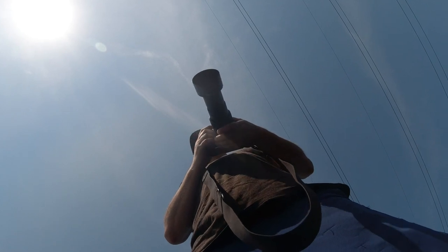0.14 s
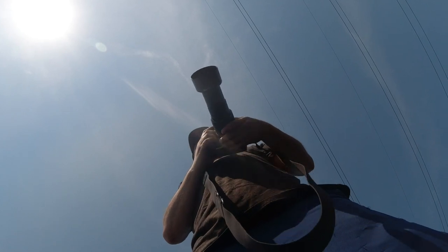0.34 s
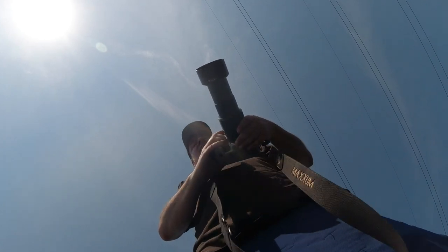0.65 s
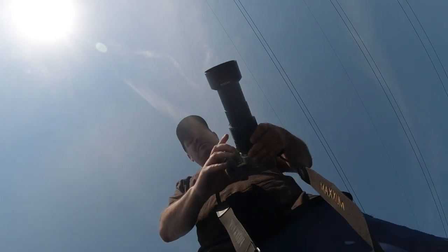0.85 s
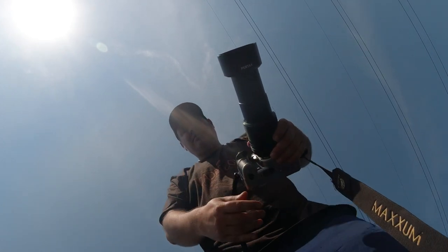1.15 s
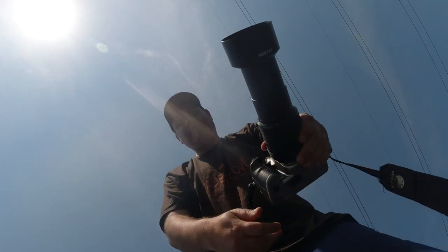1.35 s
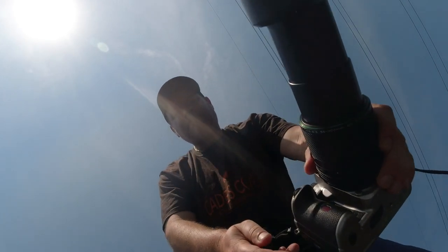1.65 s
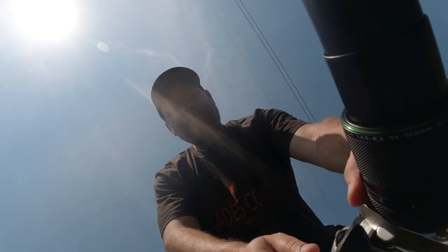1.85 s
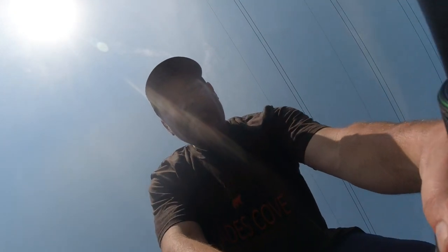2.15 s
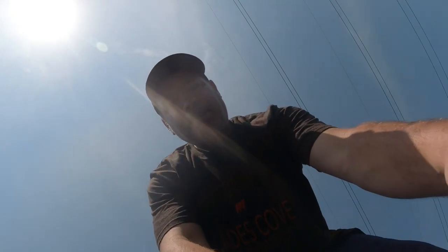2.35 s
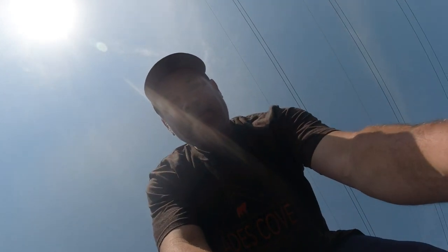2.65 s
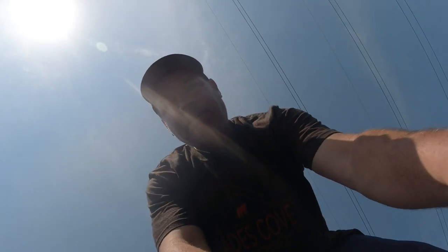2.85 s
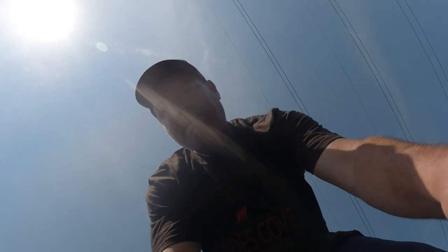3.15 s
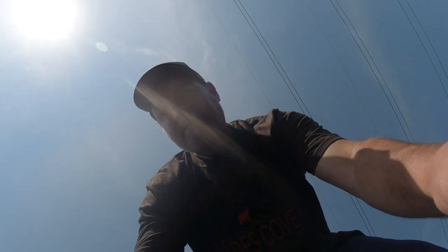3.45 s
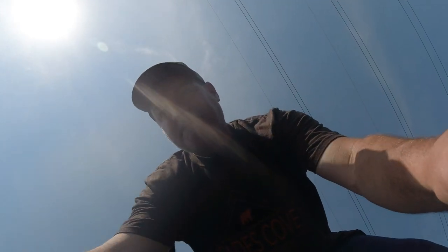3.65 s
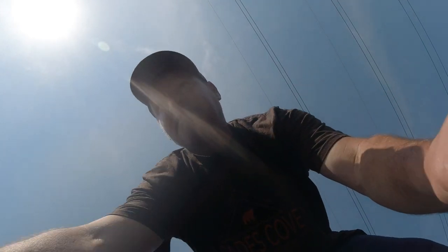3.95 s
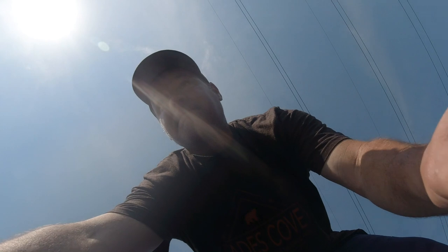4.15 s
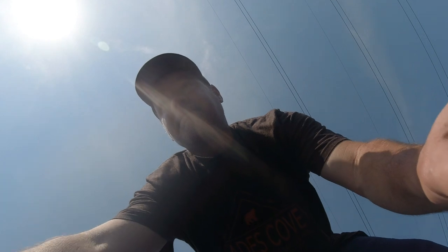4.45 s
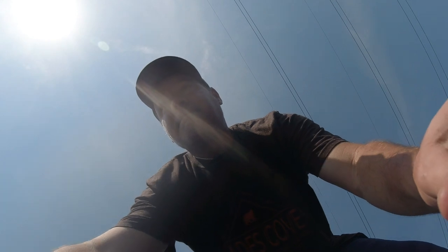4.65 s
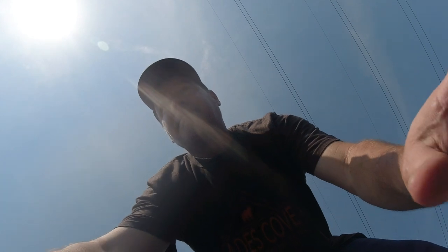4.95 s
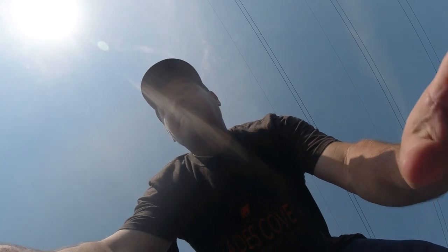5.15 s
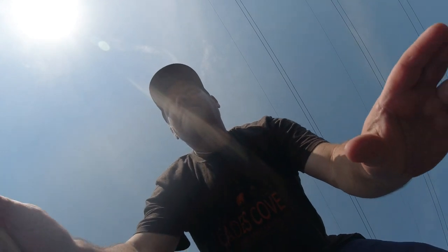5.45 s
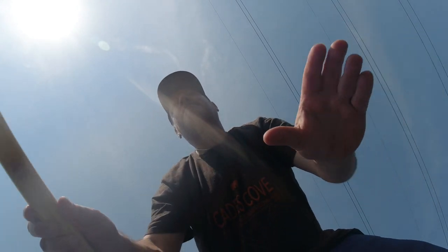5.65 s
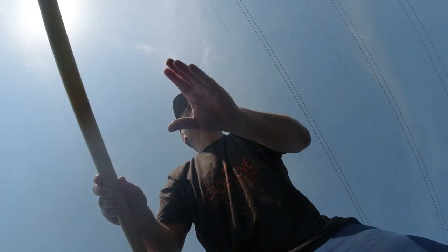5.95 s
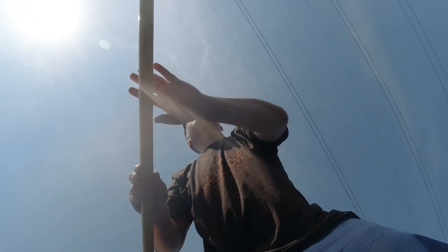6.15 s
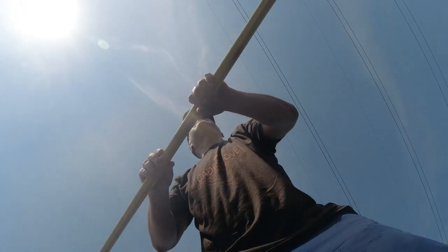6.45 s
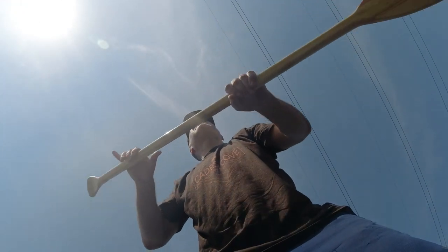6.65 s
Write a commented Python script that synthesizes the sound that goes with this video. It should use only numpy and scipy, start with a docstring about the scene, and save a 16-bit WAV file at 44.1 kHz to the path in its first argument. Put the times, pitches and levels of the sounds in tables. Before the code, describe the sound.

Close, dry handling inside a small hollow boat, the microphone low on the floor. Webbing slides and whistles narrowly, a lens barrel bumps dully, and the hull booms under knocks, loudest about three seconds in. After a lull, a wooden paddle drags and knocks with deep floor thuds, then only small taps and soft cloth remain over a very quiet murmur of air and water.

```python
"""On a calm lake, in a canoe, a man sets down a camera and takes up a wooden paddle, heard from the boat's floor.
Strap and clothes rustle and whistle narrowly as they rub: random tiny slips and filtered noise. Gear, paddle
and a hollow lens barrel are struck bodies: fading tones plus bursts of noise. Knocks and drags set the hollow
hull ringing the same way, and its floor thuds in slow swings. Under it all lies a low murmur of air and water,
made of filtered noise."""
import sys
import numpy as np
from scipy import signal
from scipy.fft import rfft, irfft, next_fast_len
from scipy.io import wavfile
from scipy.ndimage import uniform_filter1d, map_coordinates

SR = 44100
rng = np.random.default_rng(int(sys.argv[2]) if len(sys.argv) > 2 else 0)


def bounce(signal):
    """Save signal as a 16-bit WAV file at the path given by the first command-line argument."""
    frames = np.transpose(np.atleast_2d(signal))
    limited = np.clip(frames, -1, 1)
    pcm = np.round(limited * 32767).astype(np.int16)
    wavfile.write(sys.argv[1], SR, pcm)


N = 299439

# murmur of air and water: start_s, relative level_db
MURMUR_LEVEL = [(0, -45.5), (1.2, -48), (2.55, -48), (3.1, -51), (3.35, -58.5), (4.1, -60.5), (4.7, -57),
                (5.5, -60), (6.79, -58.5)]
# tone of the murmur: pitch_hz, relative level_db
LAKE_COLOUR = [(12, -36), (20, -5.5), (134, -2), (328, -11), (380, -12.5), (500, -19), (738, -19.5),
               (1150, -35), (1400, -36), (1910, -44.5), (2200, -42), (12100, -54.5), (16000, -77.5)]
# where the man works: start_s, delay of the left microphone port delay_ms
BEARING = [(0, -0.27), (1.2, 0.075), (2.6, 0.0092), (3.2, 0.053), (3.5, -0.11), (4.4, -0.08), (6.79, 0.02)]
# reflections inside the boat: delay_ms, gain (before it fades with delay), left-right spread_ms
WALLS = np.column_stack([rng.uniform(1, 13, 14), rng.uniform(-1, 1, 14), rng.uniform(-.1, .1, 14)])

# slides of strap and clothes: start_s, length_s, swell over the slide swell_db, rustle_db, hiss_db
SLIDES = [(.3, 1, 9, -79, -108), (1.225, 0.14, -19, -60.5, -77), (1.375, 0.17, 5, -56, -77.5),
          (1.51, 0.042, 11, -49, -60.5), (1.57, .39, 13, -49, -59), (2.065, 0.14, 6.5, -50, -93),
          (2.21, 0.078, 6, -57, -88), (2.37, 0.6, -13, -68, -96), (2.79, 0.064, 2.5, -47, -80),
          (2.945, 0.057, 12, -40.5, -59.5), (3, 0.1, -22, -39.5, -61), (3.245, 0.03, -6, -50.5, -97.5),
          (3.29, 0.34, -15, -67, -85), (3.46, 0.11, -9, -56, -87), (4.475, 0.048, -12.5, -66, -99),
          (4.8, 0.12, 7, -59, -81.5), (5.08, 0.11, 3.5, -70, -100.5), (5.4, 0.066, 2, -68, -93),
          (5.675, 0.057, -1, -55, -59.5), (5.775, 0.011, 5.5, -56, -59), (6.6, 0.17, 6, -77.5, -77.5)]
# tone of the rustle, and of the hiss of fast sliding: pitch_hz, relative level_db
CLOTH_COLOUR = [(300, -31), (550, -4), (850, -4), (1200, 0.5), (1430, -4.5), (1540, 0.5), (1680, -4.5),
                (1850, -8), (2400, -6), (3200, -8), (3900, -11.5), (4600, -15), (5500, -29), (8000, -30.5),
                (11000, -55.5)]
HISS_COLOUR = [(3000, -40), (5000, 2.5), (6500, -3.5), (8300, 4.5), (10000, -23), (11800, 2), (12900, 1.5),
               (13800, -12), (15500, -23.5)]
# narrow, rough whistles of rubbing: nylon webbing over an edge, or the ring of the lens barrel:
# start_s, length_s, pitch_hz, level_db
WHISTLES = [(1.428, 0.18, 1520, -60), (1.634, 0.28, 3320, -56), (2.07, 0.19, 3100, -53),
            (2.115, .11, 4180, -62), (2.214, .1, 3100, -54.5), (2.371, 0.08, 3360, -55),
            (2.769, 0.035, 3930, -56), (2.82, 0.039, 1540, -47.5), (3.295, 0.13, 3050, -65),
            (3.537, 0.23, 4150, -67.5), (3.506, 0.051, 4400, -57), (3.748, 0.017, 4420, -56.5),
            (3.771, 0.015, 4400, -59), (4.564, .12, 4400, -70), (4.832, 0.069, 3460, -61),
            (5.026, 0.019, 4360, -60), (5.419, 0.015, 4280, -60), (5.437, 0.023, 4380, -59)]
# dry snaps of hard plastic and metal: start_s, length_s, level_db, hardness_db_per_octave
SNAPS = [(1.2251, 0.0054, -29.5, -56), (3.006, 0.0014, -14.5, -2), (3.013, .0009, -28, -3.5),
         (3.0222, 0.00032, -17.5, -8.5), (3.0507, 0.0011, -31.5, -8.5)]
# tone of a snap before its hardness: pitch_hz, relative level_db
SNAP_COLOUR = [(600, -15.5), (1500, 5.5), (2100, -2.5), (2850, 8), (4200, -4.5), (6000, -12.5),
               (9000, -11.5), (12500, -7.5), (15000, -23)]
# wood and shoes drag on the hull: start_s, length_s, swell over the drag swell_db, level_db, bass weight bass_db
DRAGS = [(1.41, 0.64, 23, -55, 0.5), (2.06, .55, -9.5, -54.5, 1), (2.776, 0.11, -0.5, -39.5, 2),
         (2.949, 0.025, 8, -41.5, 3.5), (3.02, 0.086, -13, -35, -2), (3.475, 0.14, -5.5, -54, -2.5),
         (4.27, 0.064, 1, -52.5, 1), (4.468, 0.071, -2.5, -37, 4.5), (4.811, 0.15, 3.5, -45, -2.5),
         (5.064, 0.15, 6.5, -50, -6), (5.28, 0.09, -5, -51, 1)]
# tone of a drag before its bass weight: pitch_hz, relative level_db
DRAG_COLOUR = [(50, -9.5), (120, -1.5), (280, -5), (450, -3), (1600, 0.5), (2500, -15.5), (5000, -23.5),
               (10000, -46)]
# the floor flexes under shifting weight: start_s, starting pitch_hz, level_db, fade by 60 dB t60_s, sag_octaves
THUDS = [(1.786, 58, -32.5, 0.34, 0.25), (2.218, 51.8, -35.5, 0.091, 0), (2.293, 303, -26, 0.13, 1.17),
         (2.319, 46, -25.5, 0.15, 0), (3.027, 136, -27.5, 0.25, 0.13), (4.411, 73.8, -25.5, 0.26, 0.00078),
         (4.838, 134, -19.5, 0.13, 0), (4.852, 162.8, -18.5, 0.2, 0.25), (4.926, 148, -17, 0.11, .5),
         (4.952, 168.7, -17.5, 0.22, 1.38), (5.049, 146, -31, 0.21, 0.76), (5.318, 152, -39, 0.17, 0.32)]

# the hollow lens barrel is bumped: start_s, level_db, hardness_db_per_octave
BUMPS = [(2.014, -29, -3)]
# small clicks of buckles and gear: start_s, level_db, hardness_db_per_octave, body_db, favoured pitch_hz
CLICKS = [(.564, -70.5, 5.5, -5, 4230), (.865, -67.5, 3.5, 5, 2300), (1.54, -46.5, -1.5, 5, 1560),
          (1.911, -41.5, -10, -17, 1490), (2.336, -52.5, -3.5, -1.5, 3230), (3.42, -58.5, 0.5, 8, 2890),
          (3.503, -45, 1, -3, 1794), (3.53, -57, 5, -1, 4190), (3.582, -59, 1.5, -21, 1653),
          (4.211, -55.5, -5.5, 1, 1563), (4.409, -30, -18.5, 0, 1115), (4.817, -47, 4, 0, 4350),
          (4.918, -54, -1.5, -2.5, 2430), (5.298, -59, -7, -5, 1650), (5.474, -61, -2, -21, 1705),
          (6.48, -56, -6.5, -8.5, 1113)]
# the paddle shaft meets the hull or a hand: start_s, level_db, hardness_db_per_octave, body_db, favoured pitch_hz
TAPS = [(4.479, -46, -5.5, -4, 1330), (4.925, -47, -7, -21, 845), (5.195, -55.5, -8, -9, 836),
        (5.375, -49.5, 1.5, -27, 830), (5.569, -58, -8.5, -4.5, 837), (5.666, -50.5, -7, 1, 1124),
        (5.792, -65, 11, 4, 2010), (5.979, -51, 0, -0.5, 1550), (6.081, -51.5, -4.5, -1.5, 1720),
        (6.202, -63.5, -7.5, 1, 1750)]
# blows on the hull: start_s, level_db, hardness_db_per_octave, bass boom_db, struck panel pitch_hz
KNOCKS = [(1.241, -43.5, 3, -0.5, 494), (1.945, -53, 2, -17.5, 427), (2.023, -43.5, 4.5, -8.5, 802),
          (2.285, -47, 3, -14.5, 796), (2.623, -25, 2, -6.5, 1026), (2.645, -34.5, -6, -10.5, 422),
          (2.706, -52.5, 4, 2.5, 244), (2.802, -33, -6, -0.5, 297.7), (2.821, -30.5, 0.5, -16.5, 481),
          (2.868, -33.5, 3, -18, 388), (2.914, -30, 2, -14, 459), (3.005, -24, 6.5, -12.5, 329),
          (3.012, -25.5, 0, -13, 980), (3.02, -22.5, -6.5, -14, 309.6), (3.034, -31, -4.5, -9, 240),
          (3.051, -25, 3, -10, 968), (3.09, -31.5, -1, -18, 277), (3.25, -41, -19.5, -21, 397),
          (3.459, -56.5, 5, -16, 1000), (3.53, -48, -5, -15, 486), (3.585, -51, 1, -11.5, 491),
          (4.407, -29.5, 1, -0.5, 1151), (4.415, -31.5, 0, -7.5, 535), (4.435, -28, -6.5, -11.5, 277.6),
          (4.462, -39.5, -6.5, -10.5, 413), (4.495, -33, -2, -5.5, 720), (4.567, -46.5, -8, 0.5, 329),
          (4.822, -29.5, 1.5, -7.5, 800), (4.84, -25, -4.5, -2.5, 527), (4.929, -25.5, -7.5, -10, 520),
          (4.953, -37, -2.5, 0, 453), (5.253, -34, 0.5, -9.5, 577), (5.271, -37.5, -8, -7, 292.5),
          (5.668, -46, 1.5, -9.5, 494), (6.234, -59, 0.5, -8, 999)]
# ringing tones of each body, before each blow varies them: pitch_hz, level_db, fade by 60 dB t60_s
BARREL_MODES = [(392, -11, 0.093), (646, 6, 0.085), (770, -24, 0.048), (827, -0.5, 0.059), (938, -7, 0.041),
                (2150, -31, 0.061), (2860, -20, 0.014)]
GEAR_MODES = [(884, -18, 0.0064), (1250, -14.5, 0.02), (1520, -10.5, 0.024), (1863, -3.5, 0.049),
              (2500, -4.5, 0.0077), (3050, -2.5, 0.0062), (3560, -2.5, 0.015), (4060, 1.5, 0.038)]
PADDLE_MODES = [(332, -12.5, 0.18), (466, -15.5, 0.056), (831, 5, 0.13), (950, -14, 0.089),
                (1102, -16, 0.038), (1340, -10, 0.08), (1523, -6, 0.081), (1770, -13.5, 0.065),
                (1920, -8.5, 0.068), (2050, -11, 0.042), (2360, -15.5, 0.12), (3850, -10, 0.08)]
HULL_MODES = [(68.4, -2, 0.29), (106, -2, 0.22), (138, 1, 0.18), (157.1, 0.5, 0.23), (190.4, -3.5, 0.32),
              (239.7, 1, 0.25), (276.3, 0, 0.18), (307, -2.5, 0.09), (328.7, -3.5, 0.19), (411, -0.5, 0.17),
              (498.3, -2, 0.1), (558.5, -5, 0.2), (646, -16.5, 0.44), (762, -7.5, 0.056), (958, -14, 0.095),
              (1168, -8.5, 0.071), (1316, -9.5, 0.034), (1580, -8, 0.11), (1677, -7, 0.11),
              (2010, -16.5, 0.19), (2550, -7, 0.089), (2680, -6.5, 0.11), (3000, -4, 0.054),
              (2960, -11, 0.073)]
# how a body shares an ordinary blow among the bands: bass_db (hull only), body_db, mid_db, edge_db, treble_db
BARREL_BALANCE = [-1, -6.5, -10.5, -39]
GEAR_BALANCE = [-4.5, 1, -1.5, -24]
PADDLE_BALANCE = [-15, 3.5, -16.5, -44.5]
HULL_BALANCE = [1.5, 1, -9, -27, -49]
# centres of those bands: pitch_hz; and the borders between them: pitch_hz
BAND_HZ = [100, 380, 1200, 3100, 8000]
BAND_EDGES_HZ = [50, 200, 700, 2000, 5000, 15000]

TOP_HZ = 15300  # where the camera cuts the treble
RING_SIZE = 9216  # samples in the ring of one blow
HULL_STRAY = .035  # largest share by which a hull tone strays in pitch
PANEL_DB, PANEL_CYCLES = 10.5, 48  # the struck spot rings above the modes around it, for so many cycles
SLIDE_ATTACK_S, SLIDE_T60_S = 0.014, 0.13
STIR_DB, STIR_HISS_DB = -78.5, -100  # clothes never quite rest
CATCH_DB = 2.5  # the cloth catches and runs on as it slides
SCRATCH_DB, SCRATCH_RATE = -5, 140  # single threads snag, on average so many times a second
WHISTLE_ATTACK_S, WHISTLE_FADE_SHARE = .006, .45  # a whistle sets in quickly and fades over its last part
SNAP_T60_S, SNAP_PIVOT_HZ = 0.0016, 4566  # hardness tilts the tone above the pivot
DRAG_ATTACK_S, DRAG_T60_S = 0.0087, 0.2
DRAG_TOP_HZ, DRAG_BASS_HZ = 1400, 350  # a drag rings tones below the first; its weight acts below the second
THUD_ATTACK_S, SAG_S = 0.0011, .06


def undb(db):
    """Decibels to gain."""
    return np.exp(np.asarray(db) * np.log(10) / 20)


def unit(x):
    """Scale to an average (rms) level of 1."""
    return x / np.sqrt(np.mean(x ** 2))


def fading(age, t60):
    """A fade that loses 60 dB in t60 seconds."""
    return np.exp(-np.log(1000) * age / t60)


def curve(table, column=1):
    """One column of a table, joined by straight lines in time."""
    rows = np.array(table)
    return np.interp(np.arange(N) / SR, rows[:, 0], rows[:, column])


def colour(x, points):
    """Filter through (Hz, dB) points; it only looks back in time, so nothing sounds early."""
    size = 2 * next_fast_len(x.shape[-1] * 9 // 16, real=True)
    hz, db = np.transpose(points)
    grid = np.maximum(np.fft.rfftfreq(size, 1 / SR), 1)
    log_gain = np.interp(np.log(grid), np.log(hz), np.log(undb(db)))
    # folding the cepstrum onto its first half gives the filter its smallest delay
    cepstrum = irfft(log_gain)
    cepstrum[1:size // 2] *= 2
    cepstrum[size // 2 + 1:] = 0
    return irfft(rfft(x, size) * np.exp(rfft(cepstrum)))[..., :x.shape[-1]]


def ports(mid, side, split_hz, bass_side_db):
    """Left and right: long waves reach both microphone ports nearly alike, short ones differ."""
    side = colour(side, [(split_hz / 4, bass_side_db), (split_hz, -1)])
    return np.array([mid + side, mid - side])


def noise_pair(size, split_hz, bass_side_db):
    """Random noise as it reaches the two ports."""
    return ports(*rng.standard_normal((2, size)), split_hz=split_hz, bass_side_db=bass_side_db)


def walk(rate):
    """Smooth random wander with an average (rms) size of 1."""
    hold = int(SR / rate)
    steps = np.repeat(rng.standard_normal(N // hold + 1), hold)[:N]
    return unit(uniform_filter1d(steps, hold))


def grains(rate, spread_db):
    """Tiny slips of random size at random moments."""
    happens = rng.random(N) < rate / SR
    boost_db = spread_db * np.minimum(rng.exponential(size=N), 4)
    return unit(happens * rng.standard_normal(N) * undb(boost_db))


def inside(x, wall_db):
    """Short waves bounce between the sides of the boat, which combs their spectrum."""
    echo = np.zeros_like(x)
    for ms, gain, spread_ms in WALLS:
        for ear, way in enumerate((-1, 1)):
            lag = int((ms + way * spread_ms) * SR / 1000)
            echo[ear, lag:] += gain * np.exp(-ms / 10) * x[ear, :-lag]
    high_pass = signal.butter(2, 700, "high", fs=SR, output="sos")
    return x + undb(wall_db) * signal.sosfilt(high_pass, echo)


def strokes(events, attack_s, t60, column=3):
    """Level of a run of rubbing motions: each sets in, swells or eases while it lasts, then dies away."""
    power = np.zeros(N)
    for row in events:
        s, length, swell_db = row[:3]
        span = np.arange(int(s * SR), min(int((s + length + t60) * SR), N))
        age = span / SR - s
        attack = np.sin(np.pi / 2 * np.clip(age / attack_s, 0, 1)) ** 2
        hold = undb(row[column] + swell_db * (np.clip(age / length, 0, 1) - .5))
        release = fading(np.maximum(age - length, 0), t60)
        power[span] += (attack * hold * release) ** 2
    return np.sqrt(power)


def ring(modes, dense_db, dense_t60, crack_db, crack_t60, stray=.006):
    """A body answers one blow with main tones (modes), a wash of dense modes and the crack of the contact."""
    t = np.arange(RING_SIZE) / SR
    hz, db, t60 = np.transpose(modes)[:, :, None]
    place, detune, skew, damping = rng.uniform(-1, 1, (4,) + hz.shape)
    # each blow favours, detunes and damps the modes differently
    swing = undb(db + 2.5 * place) * fading(t, t60 * 2 ** (damping / 2))
    phase = 2 * np.pi * hz * (1 + stray * detune) * t
    # each mode meets the two ports at its own angle
    angle = np.sign(skew) * np.minimum(0.14 + hz / 2600, .85)
    sign = (-1) ** np.arange(len(hz))[:, None]
    tones = np.array([np.sum(sign * swing * np.sin(np.float32(phase + ear * angle)), axis=0) for ear in (-1, 1)])
    noise = noise_pair(len(t), split_hz=1900, bass_side_db=-18.0)
    dull = colour(noise, [(60, 3.5), (450, 12.5), (1500, -6.0), (3000, -16.5), (8000, -24.0)])
    bright = colour(noise, [(400, -10.0), (1500, -4.5), (2900, -7.0), (4000, -0.5), (6000, -7.5)])
    wash = dull * fading(t, dense_t60) + bright * fading(2 * t, dense_t60)  # the bright part fades twice as fast
    crack = colour(noise, [(200, 14.0), (750, -1.5), (1600, 1.5), (2700, -6.5), (3300, -5.5), (4000, -13.5),
                           (6000, -14.5), (8500, -6.5), (10000, -15.0), (12300, -3.5), (16000, -23.0)])
    crack = crack * fading(t, crack_t60)
    return tones + inside(undb(dense_db) * wash + undb(crack_db) * crack, wall_db=-6.5)


def panel(modes, hz):
    """The modes of the body, and the note of the struck spot itself."""
    mode_hz, db, _ = np.transpose(modes)
    return [*modes, (hz, np.interp(hz, mode_hz, db) + PANEL_DB, PANEL_CYCLES / hz)]


def push():
    """The first shove on the surface: a short swing of pressure, its start slightly different at each port."""
    age = np.maximum(np.arange(RING_SIZE) / SR - rng.uniform(0, .00025, (2, 1)), 0)
    slow = np.exp(-age / 0.0014) * np.sin(2 * np.pi * 330 * age)
    quick = .5 * np.exp(-age / 0.00013) * np.sin(2 * np.pi * 3500 * age)
    swing = slow + quick
    return -swing / np.sqrt(np.sum(swing ** 2) / 2)


def band_levels(x):
    """Level in dB of each band over the first 20 ms of a blow."""
    size = SR // 50
    power = 2 * abs(rfft(x[:size], SR)) ** 2 / (size * SR)  # padded to one second: one step per Hz
    return 10 * np.log10(np.add.reduceat(power, BAND_EDGES_HZ)[:-1])


def blows(events, modes, balance_db, contact_hz, press_s, push_db, **body):
    """Strike a body: force sets the level, hardness tilts all above contact_hz, the spot adds weight and pitch."""
    out = np.zeros((2, N + SR))
    count = len(balance_db)
    centres = BAND_HZ[-count:]
    octaves = np.maximum(np.log2(np.array(centres) / contact_hz), 0)
    for s, db, hardness, *spot in events:
        bands_db = db + np.array(balance_db) + hardness * octaves
        struck = modes
        if spot:
            boom_db, panel_hz = spot
            bands_db[0] += boom_db
            struck = panel(modes, panel_hz)
        hit = ring(struck, **body)
        hit = hit * (1 - np.exp(-np.arange(hit.shape[1]) / (press_s * SR)))  # contact takes a moment to build
        hit = hit + undb(push_db) * np.sqrt(np.sum(hit ** 2) / 2) * push()
        for _ in range(2):  # bring the bands to their levels in two passes
            lift_db = bands_db - band_levels(hit.mean(axis=0))[-count:]
            top_db = lift_db[-1] + min(lift_db[-1] - lift_db[-2], 0)  # a falling tilt goes on to the top
            hit = colour(hit, [*zip(centres, lift_db), (TOP_HZ, top_db)])
        start = int(s * SR)
        out[:, start:start + hit.shape[1]] += hit
    return out[:, :N]


def lake():
    """Air and water murmur round the hull, which booms faintly; a breeze stirs each port on its own."""
    air = noise_pair(N, split_hz=2200, bass_side_db=-16.5)
    boom = colour(air, [(60, -44.5), (112, -18.5), (130, -2.0), (150, -18.0), (300, -46.0), (1000, -88.5)])
    breeze = colour(rng.standard_normal((2, N)), [(10, -14.0), (25, 0.5), (70, -13.5), (300, -36.0), (2000, -76.0)])
    murmur = unit(colour(air, LAKE_COLOUR)) * undb(0.71 * walk(10) - 2.0)
    murmur = murmur + undb(-9.5) * unit(boom) + undb(-7.0) * unit(breeze)
    return murmur * undb(curve(MURMUR_LEVEL))


def rustle():
    """Webbing and cloth slide in a dense run of slips with single snags; fast sliding adds a fine hiss."""
    slips = ports(grains(6000, 1.5), grains(6000, 1.5), split_hz=2100, bass_side_db=-11) * undb(1.2 * walk(55))
    snags = ports(grains(SCRATCH_RATE, 1.1), grains(SCRATCH_RATE, 1.2), split_hz=1000, bass_side_db=-10.5)
    cloth = unit(slips) + undb(SCRATCH_DB) * snags
    fibres = noise_pair(N, split_hz=5500, bass_side_db=-3.5) * undb(walk(70))
    catches = undb(CATCH_DB * walk(22))
    rub_level = strokes(SLIDES, SLIDE_ATTACK_S, SLIDE_T60_S) * catches + undb(STIR_DB)
    hiss_level = strokes(SLIDES, SLIDE_ATTACK_S, SLIDE_T60_S, column=4) + undb(STIR_HISS_DB)
    rub = unit(colour(inside(cloth, wall_db=-2.5), CLOTH_COLOUR)) * rub_level
    hiss = unit(colour(inside(fibres, wall_db=4.0), HISS_COLOUR)) * hiss_level
    return rub + hiss


def rubbing_whistles():
    """Webbing rubs over an edge, or a rubbed lens barrel rings: noise in a narrow band, roughly uneven in level."""
    out = np.zeros((2, N + SR))
    catch = undb(4.5 * walk(130))  # the rubbing catches and lets go many times a second
    for s, length, hz, db in WHISTLES:
        size, start = int(length * SR), int(s * SR)
        rub = inside(rng.standard_normal((2, size)) * np.roll(catch, -start)[:size], wall_db=-5.5)
        tone = colour(rub, [(hz / 2, -32), (hz * 0.56, -13), (hz * 0.72, -9), (hz, 0),
                            (hz * 1.3, -11), (hz * 1.1, -36)])
        age = np.arange(size) / SR
        level = np.minimum(age / WHISTLE_ATTACK_S, 1) * np.minimum((1 - age / length) / WHISTLE_FADE_SHARE, 1)
        out[:, start:start + size] += undb(db) * unit(tone) * level
    return out[:, :N]


def snaps():
    """Hard parts chatter against each other for an instant and stop dead: short gated noise."""
    out = np.zeros((2, N + SR))
    t = np.arange(SR // 20) / SR
    for s, length, db, hardness in SNAPS:
        gate = fading(np.maximum(t - length, 0), SNAP_T60_S)
        chatter = noise_pair(len(t), split_hz=5600, bass_side_db=-12.5) * gate
        tone = [(hz, level + hardness * max(np.log2(hz / SNAP_PIVOT_HZ), 0)) for hz, level in SNAP_COLOUR]
        snap = colour(chatter, tone)
        loudness = np.sqrt(np.sum(snap.mean(axis=0) ** 2) / (length * SR))
        start = int(s * SR)
        out[:, start:start + len(t)] += undb(db) * snap / loudness
    return inside(out[:, :N], wall_db=-23.5)


def barrel_bumps():
    """The hollow lens barrel rings dully under a soft, slow contact."""
    return blows(BUMPS, BARREL_MODES, BARREL_BALANCE, contact_hz=1200, press_s=0.0061, push_db=-24.0,
                 dense_db=-14.0, dense_t60=0.017, crack_db=1.5, crack_t60=0.022)


def gear_clicks():
    """Small buckles and gear click: high, short tones with a very brief crack."""
    return blows(CLICKS, GEAR_MODES, GEAR_BALANCE, contact_hz=1160, press_s=0.00065, push_db=-25.0,
                 dense_db=5.5, dense_t60=0.11, crack_db=14.5, crack_t60=0.00085)


def paddle_taps():
    """The wooden shaft rings when it meets the hull or a hand."""
    return blows(TAPS, PADDLE_MODES, PADDLE_BALANCE, contact_hz=1194, press_s=0.0026, push_db=-21.5,
                 dense_db=-6, dense_t60=0.24, crack_db=10, crack_t60=0.02)


def drag():
    """Stick and slip on the boat's floor keeps the low modes ringing; each drag rubs another spot."""
    out = np.zeros((2, N))
    slips = grains(800, 1.6) * undb(3.5 * walk(70))
    low_modes = [mode for mode in HULL_MODES if mode[0] < DRAG_TOP_HZ]
    for row in DRAGS:
        level = strokes([row], DRAG_ATTACK_S, DRAG_T60_S)
        span = np.flatnonzero(level)
        hull = ring(low_modes, stray=HULL_STRAY, dense_db=1.0, dense_t60=0.16, crack_db=12, crack_t60=0.006)
        shake = signal.fftconvolve(slips[None, span], hull, axes=1)[:, :len(span)]
        bass_db = row[-1]
        tone = [(hz, db + bass_db * (hz < DRAG_BASS_HZ)) for hz, db in DRAG_COLOUR]
        out[:, span] += unit(colour(shake, tone)) * level[span]
    return out


def thuds():
    """The floor panel swings a few slow cycles; its pitch sags as the load comes off."""
    out = np.zeros(N + SR)
    t = np.arange(SR // 2) / SR
    for s, hz, db, t60, sag in THUDS:
        start = int(s * SR)
        pitch = hz * 2 ** (-sag * (1 - np.exp(-t / SAG_S)))
        swing = np.sin(2 * np.pi * np.cumsum(pitch) / SR)
        level = (1 - np.exp(-t / THUD_ATTACK_S)) * fading(t, t60)
        out[start:start + len(t)] += undb(db) * swing * level
    return out[:N]


def hull_knocks():
    """Blows set the hollow hull ringing: many low modes, a booming bass and the note of the struck panel."""
    return blows(KNOCKS, HULL_MODES, HULL_BALANCE, contact_hz=380, press_s=0.00051, push_db=-9.0,
                 stray=HULL_STRAY, dense_db=-3.0, dense_t60=0.24, crack_db=18, crack_t60=0.021)


def scene():
    """All the handling, from the side where the man works, over the lake."""
    boat = rustle() + rubbing_whistles() + snaps()
    boat += barrel_bumps() + gear_clicks() + paddle_taps()
    boat += drag() + thuds() + hull_knocks()
    # a small shift in time between the ports places the man
    delay = curve(BEARING) * SR / 1000
    left = map_coordinates(boat[0], [np.arange(N) - delay], order=3)
    return np.array([left, boat[1]]) + lake()


def record(dry):
    """The small camera thins the deepest bass, softens the treble and cuts the top."""
    thin = colour(dry, [(8, -21.0), (25, -3), (50, -0.5), (15000, -7.0)])
    return signal.sosfilt(signal.ellip(8, .2, 70, TOP_HZ, fs=SR, output="sos"), thin)


dry = scene()
out = record(dry)
bounce(out)
```